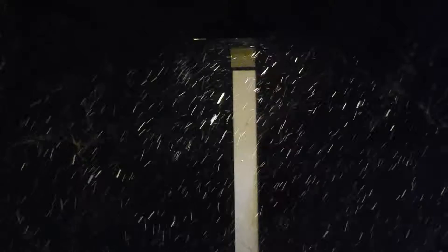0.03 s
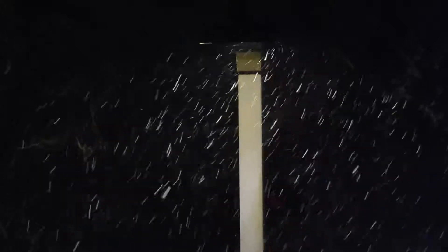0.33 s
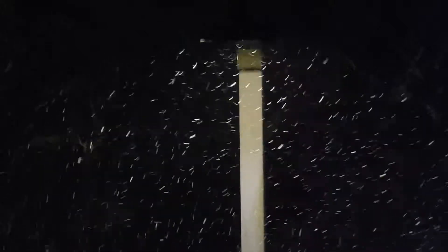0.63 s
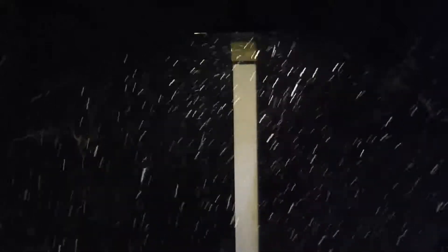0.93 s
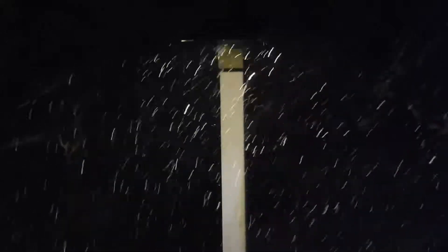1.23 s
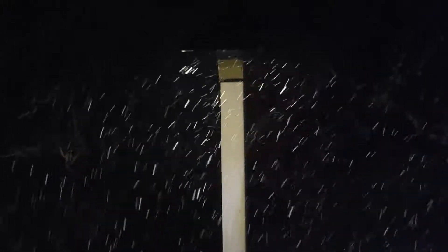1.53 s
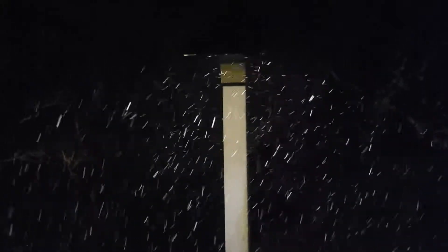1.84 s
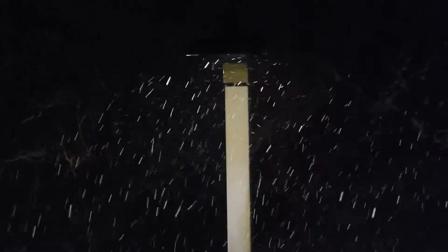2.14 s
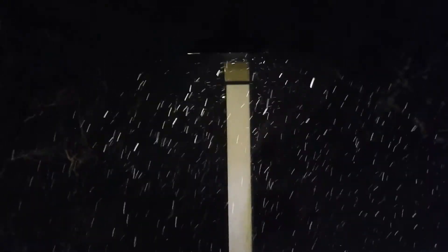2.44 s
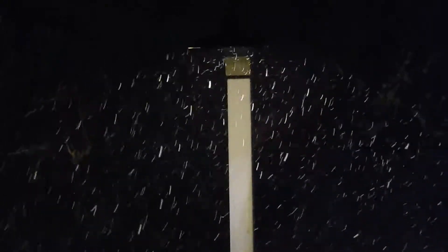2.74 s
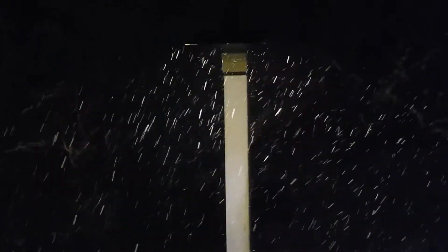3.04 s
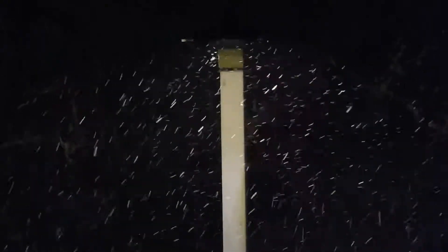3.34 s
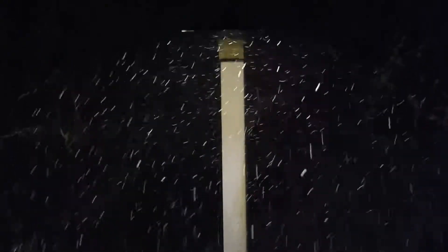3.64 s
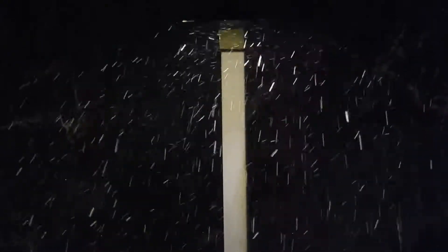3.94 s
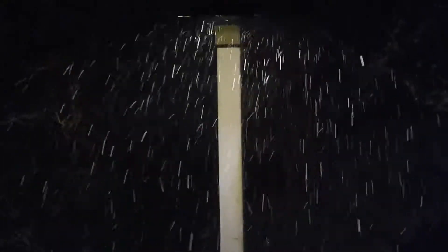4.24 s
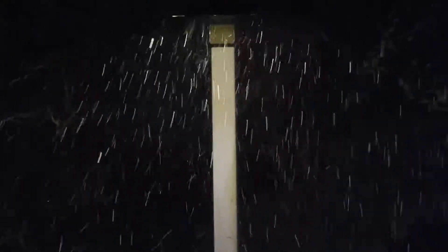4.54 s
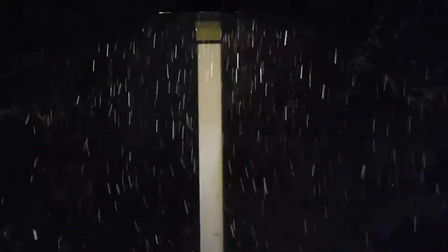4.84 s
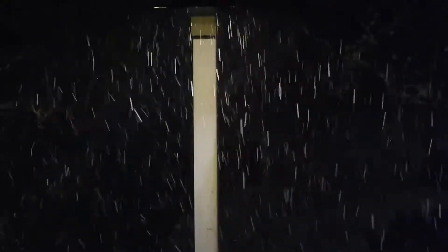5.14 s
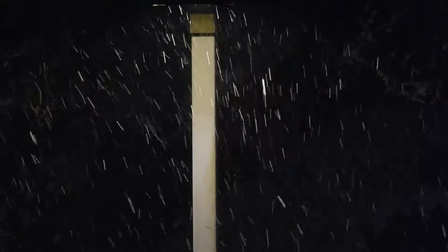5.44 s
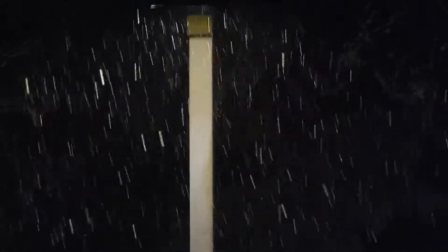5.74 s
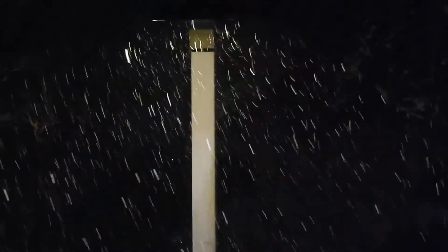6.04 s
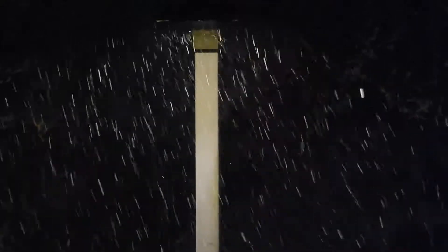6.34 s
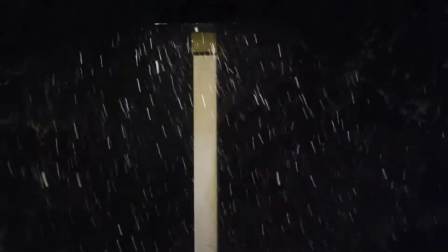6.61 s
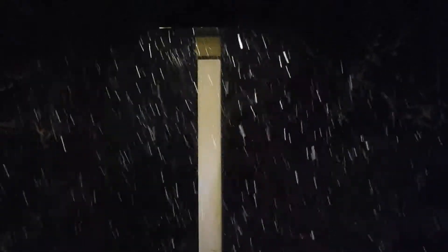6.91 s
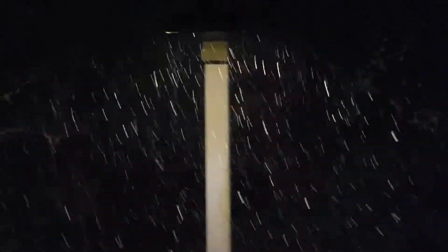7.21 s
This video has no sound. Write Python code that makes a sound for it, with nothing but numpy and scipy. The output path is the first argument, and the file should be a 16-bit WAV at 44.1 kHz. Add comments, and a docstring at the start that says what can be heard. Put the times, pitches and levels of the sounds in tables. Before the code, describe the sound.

A quiet street on a snowy night. Throughout, an engine idles far away with a deep, steady throb and a rough exhaust drone, joined by a faint low machine hum and a soft wash of distant traffic. The throb is strongest in the first second, sinks around 3 seconds and returns by about 4. A faint, high hiss flickers over everything. At about 1.2 to 1.4 seconds, a few very faint, thin chirps peek out and end in a soft tick. At 3.6 seconds there is one faint, brief, distant hoot. A vehicle then swells past with a hollow, low rumble, peaking near 5.3 seconds and quickly easing off. From about 4.5 seconds, tiny snow grains patter faintly near the microphone in uneven flurries. The low hum swells around 6.3 seconds, and the idling and patter continue until the end at about 7.3 seconds.

```python
"""The deep throb of an engine idling far away, on a quiet street on a snowy night.
Its cylinders fire in a steady rhythm over a rough exhaust drone, and a second machine's shaft hums.
Distant traffic washes softly behind them; there is one faint hoot, then one vehicle swells past.
Grains of snow patter faintly, more towards the end, in a faint, flickering hiss.
Early on, a few thin, high chirps peek out of the hiss."""
import sys
import numpy as np
from scipy import signal
from scipy.fft import rfft, irfft, next_fast_len
from scipy.io import wavfile

SR = 44100
rng = np.random.default_rng(int(sys.argv[2]) if len(sys.argv) > 2 else 0)


def digitize_waveform(pressure):
    """Quantize a signal to 16-bit integers and store it at the path in sys.argv[1].

    Rows of a 2-D input are taken as channels; values are limited to [-1, 1].
    """
    field = np.atleast_2d(pressure).T
    bounded = np.clip(field, -1, 1)
    quanta = np.round(bounded * 32767).astype(np.int16)
    wavfile.write(sys.argv[1], SR, quanta)


N = 325017
TIME = np.arange(N) / SR  # seconds
FFT_SIZE = next_fast_len(N, True)
FFT_HZ = np.fft.rfftfreq(FFT_SIZE, 1 / SR)


def gain_of(db):
    """Turns decibels into a number to multiply a sound by."""
    return 10 ** (np.asarray(db) / 20)


def unit_rms(x):
    """Scales a signal so that its average strength (rms) is 1."""
    return x / np.sqrt(np.mean(x ** 2) + 1e-20)


def at_frequency(rows, hz):
    """Looks up a table of frequencies and values, gliding between rows on a pitch scale."""
    row_hz, values = np.transpose(rows)
    return np.interp(np.log(hz + 1), np.log(row_hz + 1), values)


def over_time(rows):
    """Joins a table of times and values with straight lines."""
    return np.interp(TIME, *np.transpose(rows))


def bell(peak_s, length_s):
    """A smooth rise to 1 and back; the length is its width at half height."""
    return np.exp2(-(2 * (TIME - peak_s) / length_s) ** 2)


def smooth_step(middle_s, ease_s):
    """A smooth climb from 0 to 1."""
    return (1 + np.tanh((TIME - middle_s) / ease_s)) / 2


def drift(rate, points=4096):
    """A smooth random wobble of strength 1; a higher rate makes it quicker."""
    hz = np.fft.rfftfreq(points, 2 * N / SR / points)
    slow = irfft(rfft(rng.standard_normal(points)) * (hz > 0) / np.sqrt(1 + (hz / rate) ** 6))
    return np.interp(np.arange(N), np.linspace(0, 2 * N, points), unit_rms(slow))


def carried_db(waves):
    """How many dB the air lifts or sinks a distant sound at each moment."""
    return sum(rise_db * bell(peak_s, length_s) for peak_s, rise_db, length_s in waves)


# How alike left and right sound outdoors. Each row: frequency in Hz, likeness (1 same, 0 unrelated).
EAR_LIKENESS = [(30, 0.5), (90, 1), (180, 0.9), (350, 0.83), (700, 0.6), (1400, 0.19), (2800, 0.07),
                (5000, -0.05), (10000, 0.011)]

def stereo_noise(spectrum):
    """Noise from all around at two microphones: alike in the bass, unrelated in the treble."""
    shared, opposed = rfft(rng.standard_normal((2, FFT_SIZE)))
    likeness = at_frequency(EAR_LIKENESS, FFT_HZ)
    shared, opposed = shared * np.sqrt(1 + likeness), opposed * np.sqrt(1 - likeness)
    colour = gain_of(at_frequency(spectrum, FFT_HZ))
    pair = irfft(np.array([shared + opposed, shared - opposed]) * colour, FFT_SIZE)[:, :N]
    return pair / np.std(pair.mean(0))


# The tone colour of the hiss. Each row: frequency in Hz, relative level in dB.
HISS_SPECTRUM = [(500, -22), (2500, -2.5), (4500, 4.5), (7000, 1), (10500, 0.5), (13000, -1.5), (15700, -4)]
# The clearest flickers. Each row: middle in seconds, length in seconds, share of the way up to high_db.
HISS_FLICKERS = [(.294, .023, .72), (.463, .018, .7), (.817, .036, 0.74), (2.723, .023, .72),
                 (2.85, 0.099, 0.53), (3.166, .03, .5), (3.517, .045, 0.68), (4.057, 0.048, .6),
                 (4.255, .032, 0.71), (4.904, .05, .55), (5.37, .022, 0.66), (5.56, .022, 0.67),
                 (5.745, .05, .62), (5.989, .035, 0.55), (6.34, .037, .76), (6.453, .022, .72),
                 (6.544, .033, 0.71), (6.687, .026, .88), (6.75, .05, 0.63), (6.911, .04, .65),
                 (7.217, .036, 0.73)]

def flickering_hiss(low_db=-74.5, high_db=-65.5, flicker_hz=24):
    """A faint, high hiss flickers between a low and a high level, in both ears at once."""
    depth = 0.61 * np.clip((TIME - 0.57) / 4.2, 0, 1)  # random flicker sets in gradually
    raised = depth * (1 + np.tanh(drift(flicker_hz))) / 2
    for middle_s, length_s, share in HISS_FLICKERS:
        flat_bump = np.exp2(-(2 * (TIME - middle_s) / length_s) ** 4)
        raised = np.maximum(raised, share * flat_bump)
    floor_db = low_db - 3 * np.exp(-TIME / 0.25)  # starts a little quieter and settles
    return stereo_noise(HISS_SPECTRUM) * gain_of(floor_db + (high_db - floor_db) * raised)


# Thin, high chirps. Each row: peak time in seconds, level in dB, length in seconds, pitch in Hz.
HIGH_CHIRPS = [(1.188, -76.5, .028, 10000), (1.305, -83, .04, 9980), (1.34, -79, .014, 9980),
               (1.351, -76, .011, 9550)]
# The tone colour of the tick that ends them. Each row: frequency in Hz, relative level in dB.
TICK_SPECTRUM = [(5000, -20), (8000, -4), (9600, 0), (12000, -4), (15000, -15)]

def chirps(pitch_jitter=0.009, tick_db=-72):
    """A wavering high whistle surfaces briefly from the hiss and ends in a soft tick."""
    wavering_time = np.cumsum(1 + pitch_jitter * drift(250)) / SR
    whistle = sum(gain_of(db) * bell(peak_s, length_s) * np.sin(2 * np.pi * hz * wavering_time)
                  for peak_s, db, length_s, hz in HIGH_CHIRPS)
    tick = stereo_noise(TICK_SPECTRUM) * gain_of(tick_db) * bell(peak_s=1.352, length_s=0.016)
    return whistle + tick


# The tone colour of one snow grain landing. Each row: frequency in Hz, relative level in dB.
GRAIN_SPECTRUM = [(800, -20), (2200, -6), (3600, 0), (5000, -6), (7000, -16), (11000, -24), (16000, -22)]
# How loud the snow is, apart from flurries. Each row: time in seconds, level in dB.
SNOW_LEVELS = [(0, -85), (3.5, -90), (5.2, -74.5), (7.3, -77)]

def snow_patter(grains_per_s=1200, size_spread_db=5.5, flurry_db=6, flurry_hz=20):
    """Tiny grains of snow tick near each microphone, in uneven flurries, louder towards the end."""
    landings = rng.random((2, N)) < grains_per_s / SR
    signs = rng.choice([-1, 1], (2, N))
    sizes = gain_of(size_spread_db * np.minimum(rng.exponential(1, (2, N)), 4))
    colour = gain_of(at_frequency(GRAIN_SPECTRUM, FFT_HZ))
    grains = irfft(rfft(landings * signs * sizes, FFT_SIZE) * colour, FFT_SIZE)[:, :N]
    level_db = over_time(SNOW_LEVELS) + flurry_db * np.tanh(drift(flurry_hz))
    return unit_rms(grains) * gain_of(level_db)


# The tone colours of road rumble and tyre roar. Each row: frequency in Hz, relative level in dB.
RUMBLE_SPECTRUM = [(60, -16), (140, -1.5), (180, -0.5), (230, -2), (330, -4), (400, -4), (460, -9.5),
                   (700, -26), (1500, -52)]
TYRE_SPECTRUM = [(150, -11), (400, -6), (520, -1), (590, 2.5), (620, 1.5), (690, 0.5), (800, -2.5),
                 (1020, -4), (1220, -2.5), (1650, -8), (2300, -9.5), (2900, -12), (4000, -19),
                 (6000, -31.5), (10000, -38)]

def traffic(rumble_db=-56.5, tyre_db=-59.5):
    """Far roads: a lumpy rumble under a smooth roar of tyres, dulled by snow."""
    rumble = stereo_noise(RUMBLE_SPECTRUM) * gain_of(rumble_db + 0.5 * drift(2.7))
    tyres = stereo_noise(TYRE_SPECTRUM) * gain_of(tyre_db + 0.73 * drift(21))
    fade_in_db = -16 * np.exp(-TIME / 0.076)
    surge_db = 0.72 * bell(peak_s=3.3, length_s=3.1)
    return (rumble + tyres) * gain_of(fade_in_db + surge_db)


# The tone colour of the hoot. Each row: frequency in Hz, relative level in dB.
HOOT_SPECTRUM = [(620, -45), (745, -6), (780, -9), (815, 0), (850, -10), (950, -48)]

def hoot(level_db=-64):
    """A faint, brief hoot from far off; a narrow band of noise gives its echo-smeared tone."""
    return stereo_noise(HOOT_SPECTRUM) * gain_of(level_db) * bell(peak_s=3.62, length_s=0.099)


# The hollow rumble of the passing vehicle. Each row: frequency in Hz, relative level in dB.
VEHICLE_SPECTRUM = [(80, -34), (150, 1), (200, 1.5), (245, -5), (300, -1.5), (380, -13.5), (480, -13.5),
                    (800, -34), (1500, -54)]

def passing_vehicle(level_db=-50.5, nearest_s=5.29, nearest_m=21.3, metres_per_s=26.3):
    """A vehicle passes on a straight road; over soft snow it fades with the square of the distance."""
    distance_m = np.hypot(nearest_m, metres_per_s * (TIME - nearest_s))
    easing_db = -8.5 * smooth_step(middle_s=5.39, ease_s=0.065)  # it eases off just after passing
    return stereo_noise(VEHICLE_SPECTRUM) * gain_of(level_db + easing_db) * (nearest_m / distance_m) ** 2


# How the second machine's hum rises and falls. Each row: time in seconds, relative level in dB.
HUM_LEVELS = [(0.3, -65), (1.5, -63), (2.4, -81), (3.0, -63.5), (4.1, -65), (5.0, -60.5), (6.3, -51),
              (7.3, -59)]

def humming_machine(shaft_hz=29.38, shaft_db=-68, hum_boost_db=1, speed_wander=0.0037):
    """A turning shaft makes one very low tone, and a hum an octave above it."""
    phase = 2 * np.pi * np.cumsum(shaft_hz * (1 + speed_wander * drift(0.98))) / SR
    shaft = gain_of(shaft_db) * np.sin(phase)
    hum = gain_of(over_time(HUM_LEVELS) + hum_boost_db) * np.sin(2 * phase)
    return np.sqrt(2) * (shaft + hum)


# The tone colour of the exhaust. Each row: frequency in Hz, relative level in dB.
EXHAUST_SPECTRUM = [(10, -42), (25, -14), (45, -5), (82, -2.5), (105, 0.5), (125, 1.5), (160, -5),
                    (185, -9.5), (300, -45.5)]
# Its slow swells and dips. Each row: peak time in seconds, change in dB, length in seconds.
EXHAUST_WAVES = [(.45, 2.5, 1.1), (3.45, 2.5, 0.26), (4.0, -3.5, 0.65), (4.95, 0, 0.7), (5.75, -2, 0.38),
                 (6.4, 2, 0.35), (7.0, -0.5, 0.76)]

def exhaust(resting_db=-53.8):
    """The rough, unpitched drone of the exhaust, which the air carries in slow waves."""
    return stereo_noise(EXHAUST_SPECTRUM) * gain_of(resting_db + carried_db(EXHAUST_WAVES))


# The throb's slow swell and fade. Each row: peak time in seconds, change in dB, length in seconds.
THROB_WAVES = [(.35, 4.5, 1.15), (3.0, -10.5, 1.28)]
# The engine's other tones. Each row: pitch as a multiple of the cycle rate, relative level in dB.
ENGINE_TONES = [(4, -67), (8, -68.5), (9, -72), (11, -69.5), (12, -71), (14, -70), (16, -66), (17, -65.5),
                (18, -68.5), (19, -65), (20, -64.5), (21, -67.5), (24, -58.5), (29, -76.5), (40, -64.5),
                (48, -66.5), (56, -72.5), (64, -68), (72, -88), (96, -74.5), (104, -85), (112, -82),
                (120, -79), (136, -89), (144, -85)]
# Moments when one tone carries more strongly.
# Each row: peak time in seconds, the tone's multiple, rise in dB, length in seconds.
TONE_SWELLS = [(0.47, 17, 11, 2), (1.25, 17, 5, .6), (0.41, 19, 4.5, 1.4), (0.75, 40, 4.5, 0.7),
               (1.96, 40, 5, 0.22), (3.53, 40, 6.5, .55), (4.17, 40, 9, .55), (5.9, 40, 7.5, 0.21),
               (2.66, 48, 5.5, 0.52), (.8, 48, 6.5, 0.49), (5.95, 48, 7.5, .2), (6.58, 24, 5.5, 1.03),
               (5.17, 24, 8, 0.21), (1, 64, 8, 0.3), (4.5, 64, 2.5, .7), (5.87, 64, 8.5, 0.15)]

def idling_engine(cycle_hz=6.163, cylinders=6, throb_db=-45.5, tone_boost_db=2.5, speed_wander=0.0014):
    """Each cylinder fires once a cycle, making the throb; each tone fades on its way between houses."""
    cycles = np.cumsum(cycle_hz * (1 + speed_wander * drift(3.24))) / SR
    firing_db = throb_db + carried_db(THROB_WAVES) + 0.5 * drift(11)
    throb = gain_of(firing_db) * np.sin(2 * np.pi * cylinders * cycles)
    exhaust_db = carried_db(EXHAUST_WAVES)
    tones = np.zeros((2, N))
    for multiple, db in ENGINE_TONES:
        # higher tones reach the two microphones further out of step
        likeness = at_frequency(EAR_LIKENESS, multiple * cycle_hz)
        ear_shift = 0.38 * np.arccos(likeness) * rng.choice([-1, 1])
        phase = 2 * np.pi * (multiple * cycles + rng.random())
        phase += 0.12 * drift(9) * (multiple > 4 * cylinders)  # moving air makes high tones flutter
        level_db = db + tone_boost_db + 1.33 * drift(0.9)
        if 2 * cylinders < multiple <= 4 * cylinders:  # these tones rise and fall with the exhaust
            level_db += 0.51 * (exhaust_db - exhaust_db.mean())
        level_db += sum(rise_db * bell(peak_s, length_s)
                        for peak_s, which, rise_db, length_s in TONE_SWELLS if which == multiple)
        tones += gain_of(level_db) * np.sin([phase + ear_shift, phase - ear_shift])
    return throb + tones


def scene():
    """Adds up the street; the distant sources lie a touch to the right."""
    distant = idling_engine() + exhaust() + humming_machine() + traffic() + passing_vehicle() + hoot()
    return distant * gain_of([[-0.2], [0.2]]) + flickering_hiss() + snow_patter() + chirps()


# Narrow bands that the microphone picks up weakly. Each row: frequency in Hz, width in Hz, change in dB.
MICROPHONE_DIPS = [(2504, 56, -11.5), (7570, 81, -10)]

def record(dry, top_hz=15760):
    """The microphone opens after a moment, weakens two narrow bands and cuts the highest treble."""
    opened = dry * smooth_step(middle_s=0.114, ease_s=0.004)
    size = next_fast_len(N + SR, True)
    hz = np.fft.rfftfreq(size, 1 / SR)
    dips_db = sum(db / (1 + (2 * (hz - centre) / width) ** 2) for centre, width, db in MICROPHONE_DIPS)
    coloured = irfft(rfft(opened, size) * gain_of(dips_db), size)[:, :N]
    treble_cut = signal.firwin(511, top_hz, window=("kaiser", 9), fs=SR)
    return signal.oaconvolve(coloured, treble_cut[None], "same")


dry = scene()
out = record(dry)
digitize_waveform(out)
```